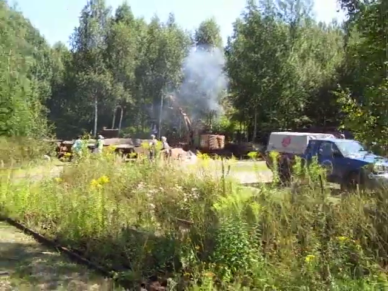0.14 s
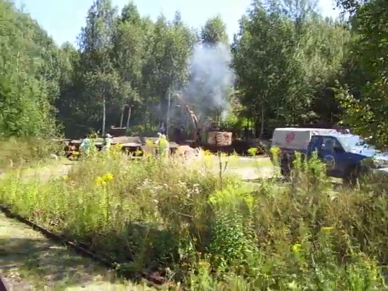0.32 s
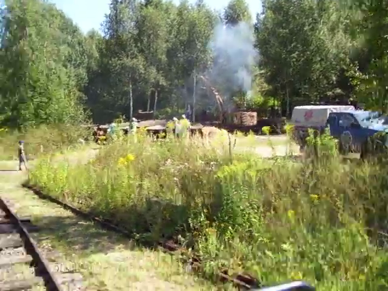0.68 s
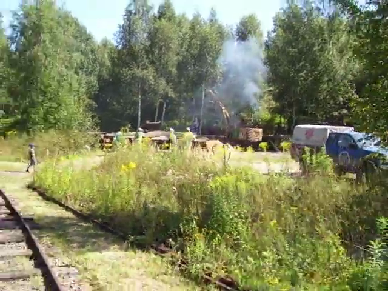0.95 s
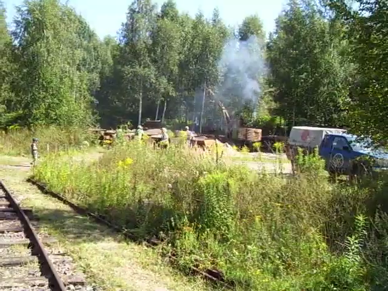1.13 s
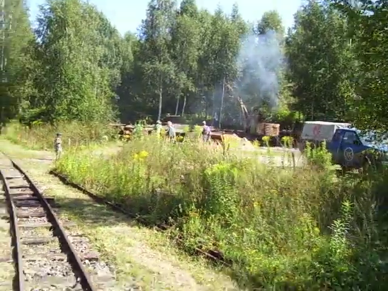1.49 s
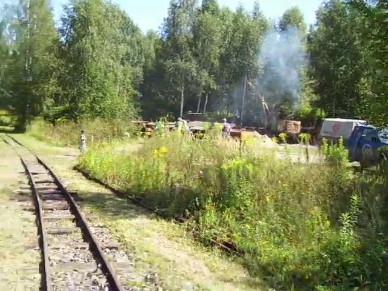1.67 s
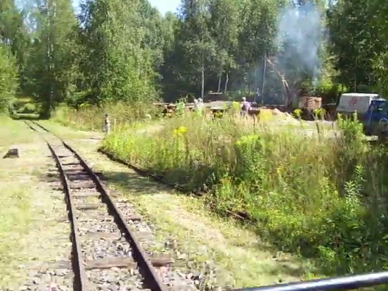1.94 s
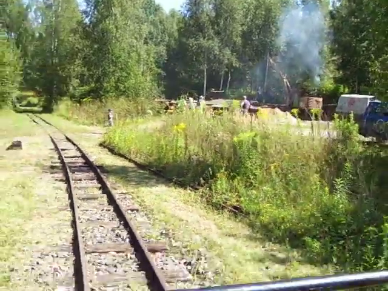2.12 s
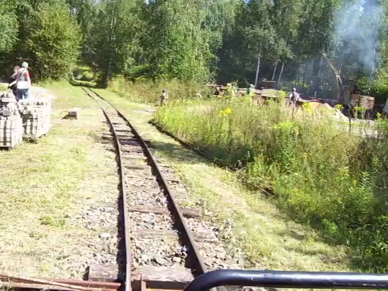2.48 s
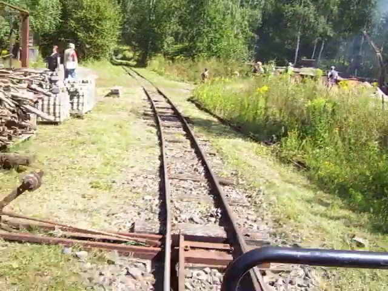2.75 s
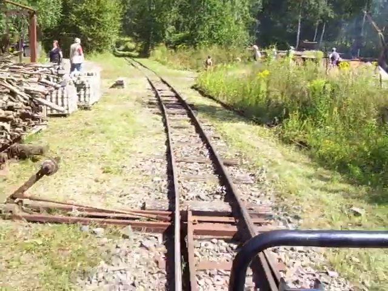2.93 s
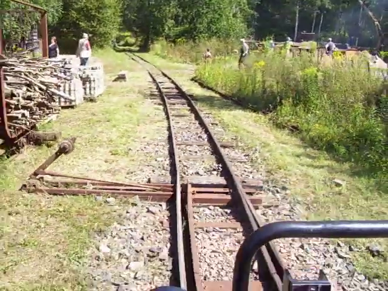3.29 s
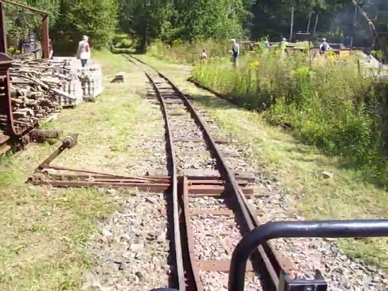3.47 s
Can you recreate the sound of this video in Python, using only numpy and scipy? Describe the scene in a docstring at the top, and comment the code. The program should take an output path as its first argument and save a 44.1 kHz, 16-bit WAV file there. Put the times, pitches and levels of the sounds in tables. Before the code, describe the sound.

A small steel rail car rolls over light track, heard from on board. Grainy rumble, droning frame and clattering plates start at once, with jolts near 0.35 and 0.55 s and the hardest clank at 0.7 s. Rolling nearly drops away at 1 s, then returns unevenly; jolts and thuds cluster from 1.9 to 2.8 s. Clanks continue, rolling swells at the end. Low engine hum throughout; dull, clipped mono microphone.

```python
"""A small steel rail car rolls over light track, heard from on board through a narrow-band microphone that overloads.
It starts with rumble, droning steel and clanking plates, a pair of jolts and, near 0.7 s, the hardest clank.
The rolling then sinks to its quietest near 1 s and comes back unevenly; more jolts follow between 1.9 and 2.8 s.
Thuds and clanks go on to the end, where the rolling grows again. Two low engine tones hum all the while.
Wheels, frame and plates are grainy noise sent through resonances; rings and hum are sine waves."""
import sys
import numpy as np
from scipy import signal
from scipy.fft import rfft, irfft, next_fast_len
from scipy.io import wavfile
from scipy.ndimage import map_coordinates

SR = 44100
rng = np.random.default_rng(int(sys.argv[2]) if len(sys.argv) > 2 else 0)


def gain_from_db(level_db):
    """Convert decibel levels to linear amplitude factors (20 dB per decade)."""
    decades = np.asarray(level_db, float) / 20
    return 10 ** decades


def digitize_waveform(pressure):
    """Quantize a signal to 16-bit integers and store it at the path in sys.argv[1].

    Rows of a 2-D input are taken as channels; values are limited to [-1, 1].
    """
    field = np.atleast_2d(pressure).T
    bounded = np.clip(field, -1, 1)
    quanta = np.round(bounded * 32767).astype(np.int16)
    wavfile.write(sys.argv[1], SR, quanta)


N = 159642  # length in samples

# clanks of the loose plates, each with a knock on the frame: t/s, plate peak level/dB, frame peak level/dB
CLANKS = [(0.0373, -15, -23.5), (0.0911, -11.5, -4), (0.166, -19, -23.5), (0.2513, -21, -13),
          (0.37, -14.5, -12.5), (0.4623, -7, -8.5), (0.5442, -8, -4.5), (0.613, -10.5, 0),
          (0.659, -9, -0.5), (0.6879, 2.5, 4.5), (0.775, -6.5, -0.5), (0.7975, -10.5, -14.5),
          (1.106, -25, -24.5), (1.1669, -15, -13), (1.33, -18.5, -10), (1.485, -22, -13),
          (1.5873, -24.5, -7), (1.6267, -15, -2), (1.7489, -16.5, -15), (1.8096, -16.5, -9),
          (1.8891, -18, -11), (2.1076, -13, -13.5), (2.166, -23.5, -5.5), (2.2766, -14, -13.5),
          (2.3506, -11, -7), (2.4312, -14.5, -5), (2.449, -11, -4.5), (2.602, -18, -5), (2.6484, -12, -16),
          (2.7405, -22.5, -0.5), (2.805, -9.5, -4), (2.9447, -11.5, -2.5), (3.095, -19.5, -15),
          (3.1497, -17, -14.5), (3.231, -15.5, -9.5), (3.304, -24.5, -9), (3.386, -16, -23),
          (3.4477, -8, -5), (3.481, -8, -5), (3.525, -14, -7), (3.5768, -11, -6.5)]
# resonances of the steel frame: f/Hz, width/Hz, height over the broad colour/dB
FRAME_MODES = [(655.8, 40, 5.8), (761, 190, 4), (845.4, 16, 6.56), (923.4, 72, 3.6), (1105, 55, 2.2),
               (1488, 16, 1.1)]
# resonances of the loose plates: f/Hz, width/Hz, height over the broad colour/dB
PLATE_MODES = [(2055, 86, 1.1), (2994, 120, 2.7), (3250, 150, 4.2), (3530, 90, 1.1)]
BLOW_RISE_S = 0.003


def wheels():
    """The wheels rumble on the rail, thud at joints and take part in the jolts, through their own resonances."""
    # wheel thuds: t/s, peak level/dB
    wheel_thuds = [(0.356, -7), (0.473, -9.5), (0.629, -5), (0.69, -6), (1.895, -10), (2.278, -8),
                   (2.431, -3), (2.605, -2.5), (2.744, -3), (2.955, -8.5), (3.247, -17), (3.548, -5.5)]
    # broad colour of the wheels: f/Hz, relative level per Hz/dB
    wheel_colour = [(24, -62), (40, -24.5), (65, -15.5), (102, -5), (136, -3.5), (256, -0.5), (364, -3),
                    (600, -2), (780, -18.5), (1320, -120)]
    # resonances of the wheels: f/Hz, width/Hz, height over the broad colour/dB
    wheel_modes = [(82, 7.5, 5.5), (109.6, 6.9, 3.5), (196.4, 8.4, 7), (254.3, 4.3, 6.5)]
    crest_db = 1  # peak over rms
    times, peaks_db = np.transpose(wheel_thuds)
    rumble = rolling(column=1, slow_db=3.5, fast_db=0.0)
    thuds = bursts(times, peaks_db - crest_db, holds=0.0096, t60s=0.12, rise=0.012)
    # the wheels get the frame's jolts, 13 dB weaker
    power = rumble + thuds + jolts(column=2, gain_db=-13)
    return body(shaken(power, grain_db=-1.6), wheel_colour, wheel_modes)


def frame():
    """The steel frame drones in its resonances and is knocked by every clank and jolt."""
    # broad colour of the frame: f/Hz, relative level per Hz/dB
    frame_colour = [(210, -28.5), (350, -11), (743, -4.5), (844, -3), (1210, -9), (1460, -8.5), (1780, -12),
                    (2700, -24), (3510, -51.5), (5940, -120)]
    crest_db = 13.5  # peak over rms
    times, _, peaks_db = np.transpose(CLANKS)
    drone = rolling(column=2, slow_db=1.34, fast_db=1.5) * contacts(steady=0.6)
    knocks = bursts(times, peaks_db - crest_db, holds=0.003, t60s=0.32, rise=BLOW_RISE_S)
    power = drone + knocks + jolts(column=2)
    return body(shaken(power, grain_db=0.5), frame_colour, FRAME_MODES)


def plates():
    """Loose plates clatter: random small contacts while rolling, louder clanks, and the jolts."""
    # broad colour of the plates: f/Hz, relative level per Hz/dB
    plate_colour = [(1200, -25.5), (1900, -1.5), (2400, -2.5), (3000, 0), (3400, -3), (3800, -7.5),
                    (4200, -3.5), (5400, -51)]
    crest_db = 9.5  # peak over rms
    times, peaks_db, _ = np.transpose(CLANKS)
    rattle = rolling(column=3, slow_db=0.5, fast_db=2.0) * contacts(steady=0.29)
    clanks = bursts(times, peaks_db - crest_db, holds=0.0051, t60s=0.1, rise=BLOW_RISE_S / 2)
    power = rattle + clanks + jolts(column=3)
    return body(shaken(power, grain_db=2.5), plate_colour, PLATE_MODES)


def rings():
    """At each clank the plates and the frame also ring clearly at their own pitches."""
    times, clank_db, knock_db = np.transpose(CLANKS)
    # the rings lie under the peaks of their blows
    plate_ring = ring(times, clank_db - 14.5, PLATE_MODES, t60=0.065, tilt_db=-1)
    frame_ring = ring(times, knock_db - 16.5, FRAME_MODES, t60=0.099, tilt_db=-1.7)
    return plate_ring + frame_ring


def ring(times, peaks_db, modes, t60, tilt_db):
    """Each blow sets the modes ringing as dying sine waves, in a new mix every time; tilt is in dB per octave."""
    scatter_db, detune_share, rise_s = 4, 0.02, 0.002
    t = np.arange(SR // 5) / SR
    out = np.zeros(N + SR)
    draws = rng.standard_normal((len(times), 2, len(modes)))
    for start, peak_db, (mix, detune) in zip(times, peaks_db, draws):
        for (hz, _, mode_db), m, d in zip(modes, mix, detune):
            tilt = tilt_db * np.log2(hz / modes[-1][0])
            level = gain_from_db(peak_db + mode_db + tilt + scatter_db * m - 60 * t / t60)
            tone = np.sin(2 * np.pi * hz * (1 + detune_share * d) * t)
            out[round(start * SR):][:len(t)] += level * (1 - np.exp(-t / rise_s)) * tone
    return out[:N]


def hum():
    """Two low engine tones waver in level and pitch and swell with the course of the rumble."""
    # engine tones: f/Hz, rms level before wavering and swelling/dB
    engine_tones = [(78, -37), (112, -33)]
    waver_db, drift_hz = 3.5, 4
    follows = 0.8  # 1 would follow the rumble fully
    power = rolling(column=1, slow_db=1, fast_db=1)
    swell = (power / power.mean()) ** (follows / 2)
    tones = np.zeros(N)
    for hz, level_db in engine_tones:
        level = np.sqrt(2) * gain_from_db(level_db + waver_db * wobble(6.9))
        phase = 2 * np.pi * np.cumsum(hz + drift_hz * wobble(6)) / SR
        tones += level * np.sin(phase)
    return swell * tones


def rolling(column, slow_db, fast_db):
    """Power over time of one rolling layer, unsteady at two speeds."""
    # rolling: t/s, rumble level/dB, frame drone level/dB, plate rattle level/dB
    roll_course = [(0, -18, -14, -23), (0.149, -19.5, -14, -21), (.3, -19, -12.5, -24),
                   (0.601, -21, -15, -26.5), (.83, -27.5, -22.5, -28.5), (0.931, -28.5, -21.5, -32.5),
                   (1.008, -34.5, -30, -38.5), (1.1, -24, -25, -34.5), (1.3, -21.5, -21, -32.5),
                   (1.551, -23, -21.5, -35), (1.681, -15, -21, -30.5), (1.798, -21.5, -24, -38.5),
                   (2.101, -14, -11, -17), (2.3, -17, -19, -33), (2.54, -21.5, -22.5, -31.5),
                   (2.701, -20.5, -19.5, -33), (2.919, -21, -18.5, -32), (3.02, -22.5, -22.5, -32),
                   (3.27, -14, -16.5, -25.5), (3.421, -18, -18.5, -35.5), (3.62, -15, -13.5, -23)]
    rows = np.array(roll_course)
    level_db = np.interp(np.arange(N) / SR, rows[:, 0], rows[:, column])
    return gain_from_db(level_db + slow_db * wobble(7.577) + fast_db * wobble(35)) ** 2


def jolts(column, gain_db=0):
    """Power over time of the jolts, each a run of dense blows that shakes the whole car."""
    # jolts: start t/s, length/s, frame level/dB, plate level/dB
    jolt_runs = [(0.345, 0.062, -10.5, -16), (0.549, 0.021, -6, -16), (0.667, 0.075, -2.5, -10.5),
                 (1.911, 0.1, -9, -16.5), (1.988, .075, -7, -16), (2.161, 0.037, -15, -22),
                 (2.428, 0.024, -10.5, -26.5), (2.594, 0.013, -6, -21.5), (2.752, 0.018, -21, -33)]
    rows = np.array(jolt_runs)
    return bursts(rows[:, 0], rows[:, column] + gain_db, holds=rows[:, 1], t60s=0.12, rise=0.009)


def contacts(steady):
    """Power of random small contacts on top of a steady share; the mean is 1."""
    rate_per_s = 130
    times = rng.random(int(rate_per_s * N / SR)) * N / SR
    small = bursts(times, 0, holds=0, t60s=0.064, rise=0.00094)
    return steady + (1 - steady) * small / small.mean()


def bursts(times, levels_db, holds, t60s, rise):
    """Power over time of blows: each rises, holds, then falls by 60 dB in t60 (all in seconds)."""
    t = np.arange(SR // 2) / SR
    out = np.zeros(N + SR)
    for start, level_db, hold, t60 in np.broadcast(times, levels_db, holds, t60s):
        fall = gain_from_db(-60 * np.maximum(t - hold, 0) / t60)
        blow = gain_from_db(level_db) * fall * (1 - np.exp(-t / rise))
        out[round(start * SR):][:len(t)] += blow ** 2
    return out[:N]


def shaken(power, grain_db):
    """Random shaking force with this power; fast random level changes make it grainy."""
    grainy = gain_from_db(grain_db * wobble(400)) * rng.standard_normal(N)
    return np.sqrt(power) * unit(grainy)


def body(force, colour, modes):
    """A force sounds through a broad colour with resonances; white noise of rms 1 comes out at rms 1."""
    m = next_fast_len(N + SR // 2)
    hz = np.fft.rfftfreq(m, 1 / SR)
    f, level_db = np.transpose(colour)
    gain = gain_from_db(np.interp(np.log(hz + 1), np.log(f + 1), level_db))
    for centre, width, db in modes:
        gain = gain * (1 + (gain_from_db(db) - 1) / (1 + ((hz - centre) / (width / 2)) ** 2))
    gain = gain / np.sqrt(np.mean(gain ** 2))
    # fold the cepstrum onto positive times, so that nothing sounds ahead of its blow
    cepstrum = irfft(np.log(np.maximum(gain, 1e-4)), m)
    cepstrum[1:m // 2] *= 2
    cepstrum[m // 2 + 1:] = 0
    return irfft(rfft(force, m) * np.exp(rfft(cepstrum)), m)[:N]


def unit(x):
    """Scales a signal to rms 1."""
    return x / np.sqrt(np.mean(x ** 2) + 1e-20)


def wobble(rate):
    """A smooth curve through random points, rate points a second."""
    points = rng.standard_normal(int(N * rate / SR) + 4)
    return map_coordinates(points, [np.arange(N) * rate / SR])


def scene():
    """All parts of the car together, as one channel."""
    return (wheels() + frame() + plates() + rings() + hum())[None]


def overload(x, top, knee):
    """Bends the wave over as it nears top; a higher knee bends more sharply."""
    return x / (1 + np.abs(x / top) ** knee) ** (1 / knee)


def roll_off(x):
    """The treble ends steeply here."""
    return signal.sosfilt(signal.butter(12, 15820, fs=SR, output="sos"), x)


def record(dry):
    """The microphone input overloads, filters cut high treble and deep bass, and the output clips hard."""
    output_top = 0.715
    x = overload(dry, top=0.625, knee=8)
    # steep low-pass: 70 dB down from 5115 Hz upward
    x = signal.sosfilt(signal.cheby2(10, 70, 5115, fs=SR, output="sos"), x)
    # gentle bass cut at 21 Hz
    x = signal.sosfilt(signal.butter(1, 21, "high", fs=SR, output="sos"), x)
    mix = np.clip(x, -output_top, output_top)
    return roll_off(mix)


dry = scene()
out = record(dry)
digitize_waveform(out)
```